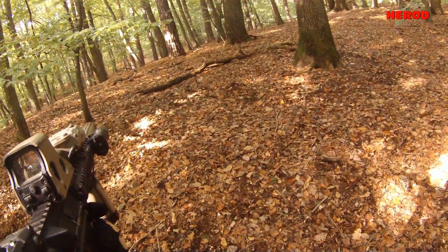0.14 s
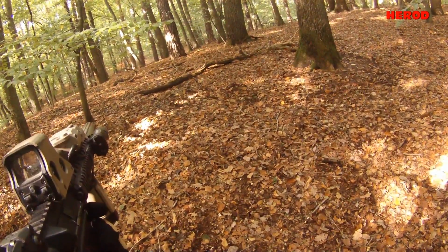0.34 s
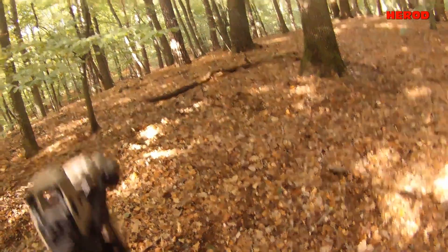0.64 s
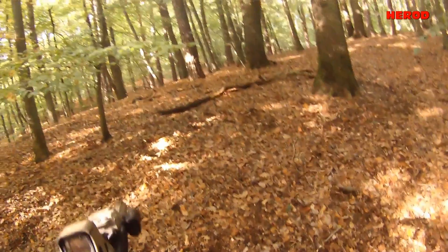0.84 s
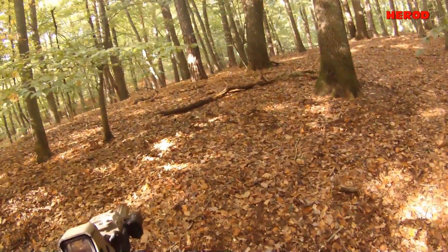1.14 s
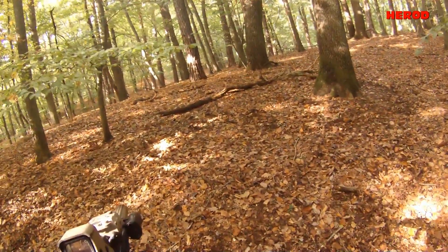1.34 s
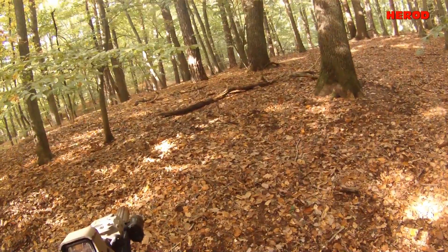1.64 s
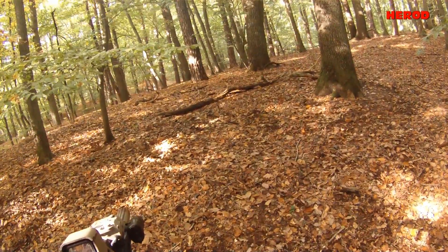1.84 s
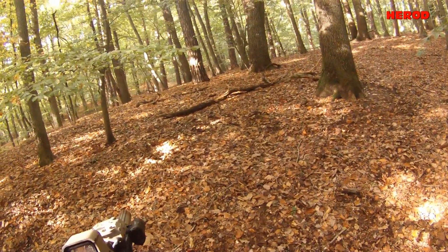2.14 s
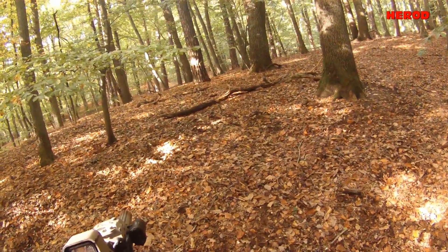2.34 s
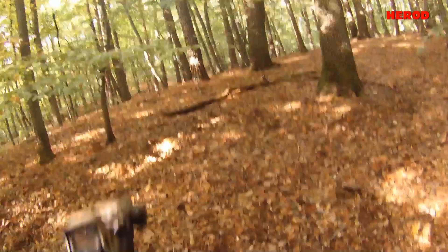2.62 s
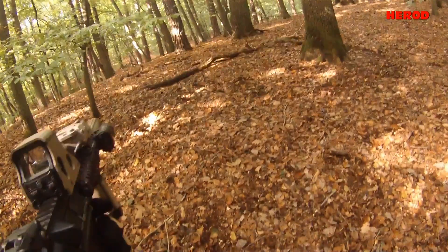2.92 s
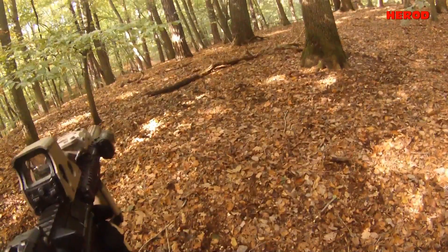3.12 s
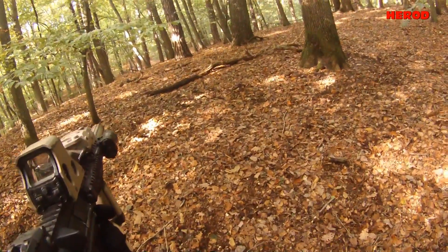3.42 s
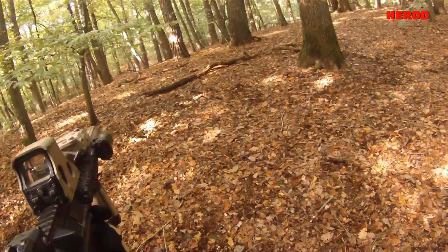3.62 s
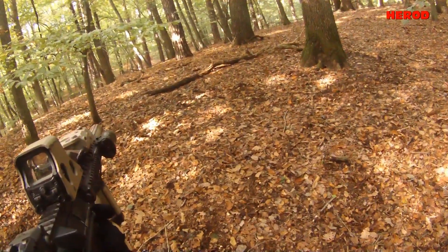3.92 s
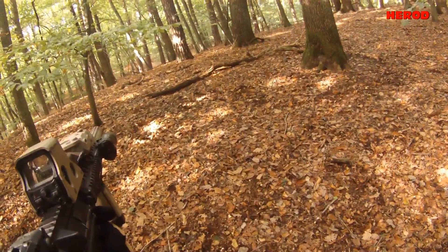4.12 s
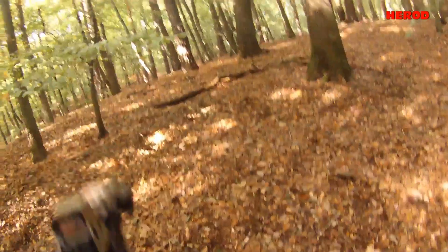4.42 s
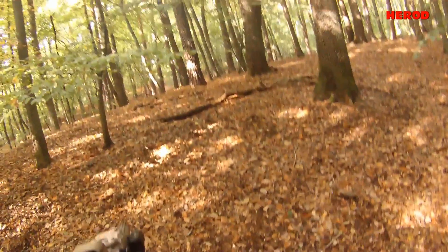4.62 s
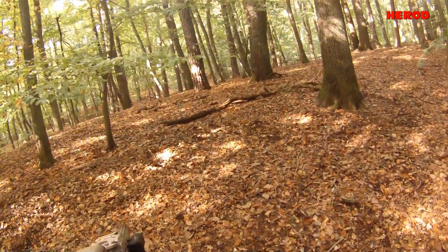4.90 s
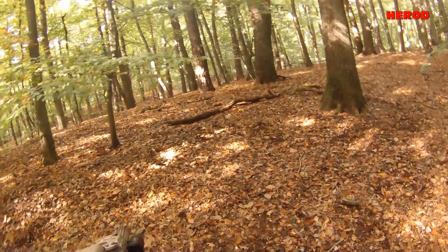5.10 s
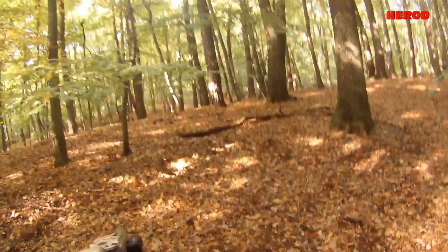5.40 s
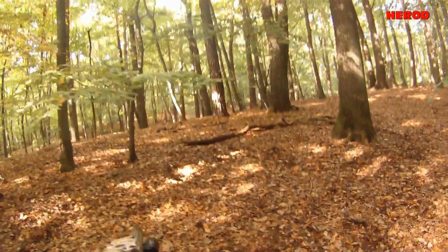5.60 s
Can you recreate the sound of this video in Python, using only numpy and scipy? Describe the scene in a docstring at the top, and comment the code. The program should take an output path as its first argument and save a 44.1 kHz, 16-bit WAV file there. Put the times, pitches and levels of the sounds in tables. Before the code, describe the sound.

Very close to the microphone, an electric airsoft rifle snaps off three quick shots after the dying tail of an earlier one. Each is a tiny rising gear whine ending in a hard, clipped clack. A click follows, then about three seconds of hush with faint rustles and hiss. Four more shots come evenly, then quiet, gear rustling and a final bump.

```python
"""Electric airsoft rifle in a wood

Seven single shots close by, in two bursts, after the dying sound of an earlier one. Gears whine and grind
on a gliding mesh rate; piston blows ring the shell modes; latches and small parts click; trees echo.
Between bursts: hush of the wood, gear rustling (all shaped noise) and microphone hiss.
The camera turns its gain down on overload and clips."""
import sys
import numpy as np
from scipy import signal
from scipy.fft import rfft, irfft, next_fast_len
from scipy.io import wavfile
from scipy.ndimage import uniform_filter1d, minimum_filter1d, map_coordinates

SR = 44100
rng = np.random.default_rng(int(sys.argv[2]) if len(sys.argv) > 2 else 0)


def inscribe(sig):
    """Save sig as 16-bit PCM at rate SR to the path in sys.argv[1].

    A 1-D sig is mono; a 2-D sig holds one channel per row.
    Samples are clipped to [-1, 1] before scaling.
    """
    pcm = np.round(np.clip(np.atleast_2d(sig).T, -1, 1) * 32767)
    wavfile.write(sys.argv[1], SR, pcm.astype(np.int16))


N = 253575
T = np.arange(N) / SR


def amp(db):
    """dB to amplitude ratio."""
    return 10 ** (np.asarray(db) / 20)


def unit(x):
    """Scale to rms 1."""
    return x / np.sqrt(np.mean(x ** 2) + 1e-20)


def along(points, hz):
    """Interpolate (f/Hz, value) points on a log frequency axis."""
    f, value = np.transpose(points)
    return np.interp(np.log(hz + 1), np.log(f + 1), value)


def filtered(x, response):
    """Multiply the spectrum of x by a response of frequency."""
    m = next_fast_len(N + SR // 2)
    spectrum = rfft(x, m) * response(np.fft.rfftfreq(m, 1 / SR))
    return irfft(spectrum, m)[..., :N]


def noise(spectrum):
    """Coloured noise of rms 1."""
    return unit(filtered(rng.standard_normal(N), lambda hz: amp(along(spectrum, hz))))


def wobble(knots_per_s):
    """Smooth random curve through normally distributed knots."""
    knots = rng.standard_normal(int(N * knots_per_s / SR) + 4)
    return map_coordinates(knots, [T * knots_per_s])


def add(track, start_s, sound):
    """Mix a sound in at a time; what falls outside is lost."""
    i = round(start_s * SR)
    sound = sound[max(-i, 0):N - i]
    track[max(i, 0):max(i, 0) + len(sound)] += sound


def ring(hz, db, t60_s, t, attack_s):
    """One struck mode: decaying sine with a soft start."""
    return amp(db - 60 * t / t60_s) * np.sin(2 * np.pi * hz * t) * (1 - np.exp(-t / attack_s))


def spit(db, t60_s, t):
    """Treble of a hard contact: decaying band noise."""
    band = signal.butter(2, [2600, 9500], "band", fs=SR, output="sos")
    envelope = amp(db - 60 * t / t60_s) * (1 - np.exp(-t / 0.0004))
    return envelope * signal.sosfilt(band, rng.standard_normal(len(t)))


# shell modes: f/Hz, level/dB, t60/s
RECEIVER_MODES = [(315, -25.5, 0.053), (509.4, -16.5, 0.037), (874, -7, 0.021), (1020, -5.5, 0.017),
                  (1235, -10, .04), (1351, 2, 0.013), (1574, -5.5, 0.013), (2360, -5.5, 0.0047),
                  (2830, -13.5, 0.01), (3510, -19.5, 0.016), (4757, -22.5, 0.0089)]


def receiver(hz):
    """The rifle's shell lifts whatever lies near its modes."""
    gain = 0.65
    for f, db, t60_s in RECEIVER_MODES:
        width_hz = np.log(1000) / np.pi / t60_s
        gain = gain + amp(db) / np.hypot(1, 2 * (hz - f) / width_hz)
    return gain


FROM_DB, CUT_DB_PER_S = -39.5, 3001


def under_load(t, lead_s, attack_s, ends_s):
    """Level in dB relative to full load: rises from the pull, is cut off near the piston release."""
    rise_db = FROM_DB * np.clip(1 - (t + lead_s) / attack_s, 0, 1) ** 2
    return rise_db - CUT_DB_PER_S * np.maximum(t - ends_s, 0)


# firing cycles: slam t/s, pull-to-slam/s, then level/dB of wind-up, piston, coasting, trigger click
SHOTS = [(-.045, .085, -17.5, 4, -20.5, -30), (0.149, .086, -16.5, -0.5, -20, -29.5),
         (0.34, .084, -16.5, -0.5, -19.5, -28), (0.5456, 0.089, -15.5, 0, -20.5, -21.5),
         (3.6531, .0855, -16, 1, -17, -25.5), (3.8682, .0844, -14.5, 0.5, -20, -19),
         (4.0619, .0836, -17, 0, -19.5, -22), (4.277, .086, -17, 0.5, -20.5, -29.5)]
# whine partials: multiple of mesh rate, level/dB
MESH_PARTIALS = [(.31, -27), (.62, -10.5), (1, -1), (1.65, -15), (2, -10), (2.4, -14)]
# lumpy grinding spectrum: f/Hz, level/dB per Hz
GRIND_SPECTRUM = [(90, -67), (150, -30.5), (290, -21), (430, -10), (1000, -1.5), (1300, 0.5), (1800, -4),
                  (2450, -3.5), (3600, -14), (5100, -14), (5700, -24), (9400, -26), (15500, -57.5)]
# motor speeds up from the pull towards the top mesh rate, slows after the slam; all speeds waver
TOP_MESH_HZ, SPIN_UP_S, COAST_MESH_HZ, SLOWS_HZ_PER_S, SPEED_WAVERS = 2230, .035, 1890, 20000, .035
# under load; *_ENDS_S relative to the slam
WHINE_DB, WHINE_ATTACK_S, WHINE_ENDS_S = -4.5, 0.024, -0.014
GRIND_DB, GRIND_ATTACK_S, GRIND_SWELLS_DB_PER_S, GRIND_ENDS_S = -3.5, .036, 52, -0.0019
# unloaded; the STILL fade adds to the COAST fade from STILL_S on
COAST_WHINE_DB, COAST_GRIND_DB, COAST_FADE_DB_PER_S = -16.5, -2.5, 38.5
STILL_S, STILL_FADE_DB_PER_S = 0.031, 360.5


def gears():
    """Teeth mesh as a gliding whine; lumpy grinding rides with it, loaded then coasting."""
    whine, grind = np.zeros(N), np.zeros(N)
    waver = 1 + SPEED_WAVERS * wobble(300)
    for slam_s, lead_s, wind_db, _, coast_db, _ in SHOTS:
        up = np.arange(-lead_s, .01, 1 / SR)
        up_hz = TOP_MESH_HZ * np.tanh((up + lead_s) / SPIN_UP_S)
        up_whine_db = wind_db + WHINE_DB + under_load(up, lead_s, WHINE_ATTACK_S, WHINE_ENDS_S)
        up_grind_db = wind_db + GRIND_DB + GRIND_SWELLS_DB_PER_S * (up + lead_s)
        up_grind_db += under_load(up, lead_s, GRIND_ATTACK_S, GRIND_ENDS_S)

        down = np.arange(0, .15, 1 / SR)
        down_hz = np.maximum(COAST_MESH_HZ - SLOWS_HZ_PER_S * down, 0)
        fade_db = coast_db + FROM_DB * np.exp(-down / .003) - COAST_FADE_DB_PER_S * down
        fade_db -= STILL_FADE_DB_PER_S * np.maximum(down - STILL_S, 0)

        loaded = up, up_hz, up_whine_db, up_grind_db
        free = down, down_hz, fade_db + COAST_WHINE_DB, fade_db + COAST_GRIND_DB
        for t, hz, whine_db, grind_db in (loaded, free):
            mesh_hz = hz * np.interp(slam_s + t, T, waver)
            turn = 2 * np.pi * np.cumsum(mesh_hz) / SR + rng.uniform(0, 2 * np.pi)
            partials = sum(amp(db) * np.sin(k * turn) for k, db in MESH_PARTIALS)
            add(whine, slam_s + t[0], amp(whine_db) * partials)
            add(grind, slam_s + t[0], amp(grind_db))
    whine *= amp(1 + 3.5 * wobble(200))  # uneven teeth
    rasp = filtered(noise(GRIND_SPECTRUM), lambda hz: receiver(hz) ** .4)
    grind *= unit(amp(2.4 * wobble(400)) * rasp)
    return filtered(whine, receiver) + grind


# release, nozzle, cushion and head blows: t from slam/s, level/dB
STROKE = [(-.0110, -6), (-.0056, -4), (-.0027, 1.5), (-.0006, 8.5)]


def piston():
    """Release, nozzle, cushion and head blows ring the shell; freed spring and air column thump."""
    out, t = np.zeros(N), np.arange(SR // 8) / SR
    thump = ring(120, -17, .05, t, .003) - ring(298, -11.5, .045, t, .003)
    for slam_s, _, _, db, _, _ in SHOTS:
        add(out, slam_s - .0135, amp(db) * thump)
        for lag_s, blow_db in STROKE:
            shell = sum(ring(f, mode_db + rng.normal(0, 1), t60_s, t, .0007)
                        for f, mode_db, t60_s in RECEIVER_MODES)
            add(out, slam_s + lag_s, amp(db + blow_db) * (shell + spit(-17.5, 0.0055, t)))
    return out


# small-part modes: f/Hz, level/dB, t60/s
LATCH_MODES = [(1080, -6, .01), (1270, -1, .022), (2060, -5.5, 0.012), (2386, -5, 0.011), (3500, -12, .009)]
KNOCK_RINGS = .8  # share of the shell's t60


def knock(db, bright_db_per_oct, shell_db):
    """A small part rings, the shell answers and treble spits; harder contacts are brighter."""
    t = np.arange(SR // 10) / SR
    tilt_db = lambda hz: bright_db_per_oct * np.log2(hz / 1300)
    shares = rng.standard_normal(len(RECEIVER_MODES))  # each knock lands elsewhere on the shell
    shell = sum(share * ring(f, 0.65 * mode_db + shell_db + tilt_db(f), KNOCK_RINGS * t60_s, t, 0.00014)
                for (f, mode_db, t60_s), share in zip(RECEIVER_MODES, shares))
    own = sum(ring(f, mode_db + tilt_db(f) + rng.normal(0, 1.5), t60_s, t, .0004)
              for f, mode_db, t60_s in LATCH_MODES)
    return amp(db - 1) * (own + shell + spit(-18.5 + tilt_db(5000), .013, t))


# gears come to rest on a bouncing latch: t/s, level/dB, bounce interval/s, brightness/(dB/octave)
STOPS = [(.0253, -9.5, .009, -0.5), (0.2174, -11.5, .009, 0), (0.4076, -4.5, .007, 0.5),
         (0.61, -8, 0.0054, -0.5), (3.7203, -6.5, .0115, 0), (3.9107, -13, .007, 1.5),
         (4.128, -7.5, .006, 0), (4.3401, -11.5, .007, 1)]
BOUNCE_LOSS_DB = 8
RECATCH_S, RECATCH_DB = .025, 4.5  # after the slam; over the coasting level
SHELL_IN_GEARBOX_DB = -4


def latches():
    """Trigger clicks at the pull, sector gear knocks as it comes round, stop latch bounces."""
    pulls = [(s - lead_s, db, 0) for s, lead_s, *_, db in SHOTS]
    recatches = [(s + RECATCH_S, db + RECATCH_DB, 0) for s, _, _, _, db, _ in SHOTS]
    bounces = [(s + k * gap_s, db - k * BOUNCE_LOSS_DB, bright)
               for s, db, gap_s, bright in STOPS for k in range(4)]
    out = np.zeros(N)
    for s, db, bright in pulls + recatches + bounces:
        add(out, s, knock(db, bright, SHELL_IN_GEARBOX_DB))
    return out


# far air in the canopy: f/Hz, level/dB per Hz
AIR_SPECTRUM = [(15, -43), (25, -21), (75, -7), (119, -5), (162, -1), (486, -3), (525, -3), (1070, -7),
                (2500, -17), (3250, -53), (5500, -120)]
# clothing and gear: f/Hz, level/dB per Hz
RUSTLE_SPECTRUM = [(120, -30), (300, 1), (485, -5.5), (1120, -4.5), (1360, -5), (3560, -23), (4250, -28.5),
                   (8000, -32), (12000, -38), (17600, -60)]
# shifts: t/s, level/dB, rise/s, fade/(dB/s) (negative swells), low flap level/dB
RUSTLES = [(1.345, -63, .03, 18, -15), (2.63, -62.5, 0.084, 26, -0.5), (5.24, -56, 0.0697, 60, -10),
           (5.43, -60.5, .025, 200, 4), (5.6, -53, 0.052, -17, -5)]
AIR_DB, STILL_RUSTLE_DB, FLAP_UNDER_HZ = -68, -77.5, 550


def wood():
    """Far air in the canopy and close rustling that crackles a little."""
    cloth = unit(amp(1.6 * wobble(77)) * noise(RUSTLE_SPECTRUM))
    flap = filtered(cloth, lambda hz: 1 / (1 + (hz / FLAP_UNDER_HZ) ** 4))
    sway_db = 1.2 * wobble(6)
    out = amp(AIR_DB + sway_db) * noise(AIR_SPECTRUM) + amp(STILL_RUSTLE_DB) * cloth
    for s, db, rise_s, fade_db_per_s, flap_db in RUSTLES:
        rise = np.clip((T - s) / rise_s, 0, 1)
        fade = amp(db - fade_db_per_s * np.maximum(T - s - rise_s, 0))
        out += rise * fade * (cloth - flap + amp(flap_db) * flap)
    return out


# echo among trunks: f/Hz, t60/s
TREES_T60 = [(200, 1.6), (700, 2.3), (1300, 1.3), (2000, 1.4), (3200, 0.6), (10000, 0.085)]


def trees(x):
    """Each echo frequency dies at its own speed; a new random echo pattern is drawn every 0.2 s."""
    out, step = np.zeros(N), SR // 5
    for i in range(0, N, step):
        hz, t, z = signal.stft(rng.standard_normal(SR), SR, nperseg=256)
        decay = amp(-60 * t / along(TREES_T60, hz)[:, None])
        tail = signal.istft(z * decay, SR, nperseg=256)[1]
        tail /= np.linalg.norm(tail)
        add(out, i / SR + 0.0084, signal.fftconvolve(x[i:i + step], tail))
    return out


# trigger, sling and buckles: t/s, level/dB, brightness/(dB/octave)
TICKS = [(.634, -15.5, 7.5), (.759, -29.5, 3), (1.3599, -51, -4), (2.2984, -52.5, 8.5), (2.6379, -54.5, 9),
         (3.2452, -57.5, 7), (3.2719, -46.5, -1), (3.4669, -37, -8.5), (3.5339, -43.5, -1.5),
         (3.6966, -12, 4), (4.1204, -19.5, 6.5), (5.3063, -40.5, -3.5), (5.368, -39, -4), (5.394, -45, -13),
         (5.612, -28.5, 5)]
SHELL_OUTSIDE_DB = -15


def ticks():
    """Single knocks of trigger, sling and buckles, stirring the shell less."""
    out = np.zeros(N)
    for s, db, bright in TICKS:
        add(out, s, knock(db, bright, SHELL_OUTSIDE_DB))
    return out


# dull bumps on stock and vest: t/s, level/dB, f/Hz
THUDS = [(5.4485, -34.5, 350), (5.6065, -11, 1240), (5.7351, -30, 380)]
THUD_CYCLES = 8.9  # until 60 dB down


def thuds():
    """Each bump is one heavily damped mode."""
    out, t = np.zeros(N), np.arange(SR // 10) / SR
    for s, db, hz in THUDS:
        add(out, s, ring(hz, db, THUD_CYCLES / hz, t, 0.41 / hz))
    return out


def scene():
    """The rifle, its echo (less coloured by the shell than the close sound) and the wood."""
    rifle = gears() + piston() + latches() + ticks() + thuds()
    afar = filtered(rifle, lambda hz: receiver(hz) ** -.6)
    return np.tile(rifle + amp(-38) * trees(afar) + wood(), (2, 1))


# microphone hiss: f/Hz, level/dB per Hz
HISS_SPECTRUM = [(1000, -4), (3000, 4.5), (8000, -1), (12000, -2.5), (16000, -8)]
TOP_HZ = 15676


def record(dry):
    """One capsule with hiss; an overload pulls the gain down for half a second; hard clip; band limit."""
    low_cut = signal.butter(1, 60, "high", fs=SR, output="sos")
    mono = signal.sosfilt(low_cut, dry[0]) + amp(-76.5) * noise(HISS_SPECTRUM)
    over = np.abs(mono) > 1
    over[0] = True  # an earlier shot has already tripped it
    hold, rise = round(.55 * SR), round(0.0058 * SR)
    held_db = minimum_filter1d(-6.5 * over, size=hold, origin=(hold - 1) // 2)  # looks back only
    gain_db = uniform_filter1d(held_db, size=rise, origin=(rise - 1) // 2)
    mono = np.clip(mono * amp(gain_db), -1, 1)
    mono += amp(-80.5) * noise(HISS_SPECTRUM)  # stage after the gain
    # faint treble noise, opposite in left and right, scaled by the sound's level: f/Hz, level/dB
    side_spectrum = [(900, -61), (1500, -50), (3000, -40.5), (7000, -47), (10000, -51.5), (14000, -57.5)]
    side = filtered(mono * rng.standard_normal(N), lambda hz: amp(along(side_spectrum, hz)))
    stereo = np.array([mono + side, mono - side])
    return np.clip(filtered(stereo, lambda hz: hz < TOP_HZ), -1, 1)


dry = scene()
out = record(dry)
inscribe(out)
```